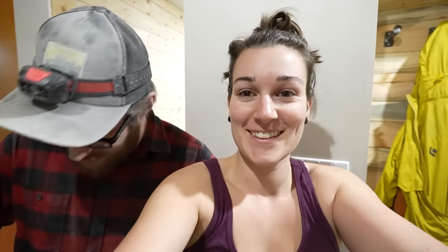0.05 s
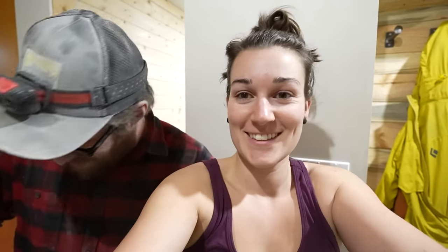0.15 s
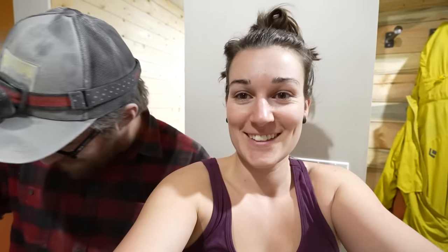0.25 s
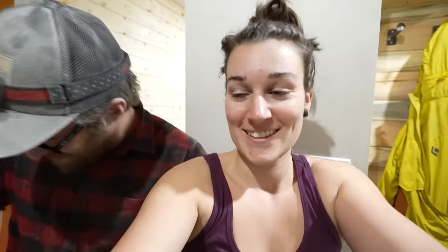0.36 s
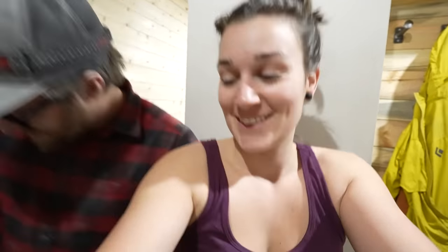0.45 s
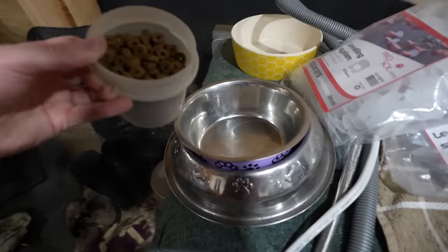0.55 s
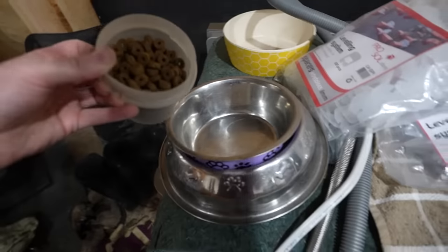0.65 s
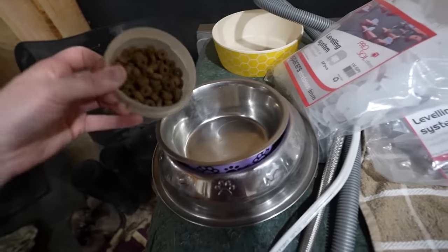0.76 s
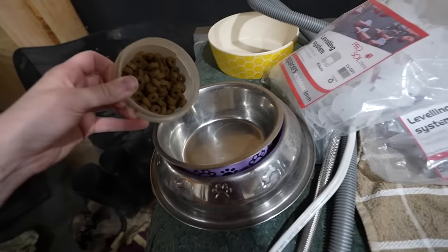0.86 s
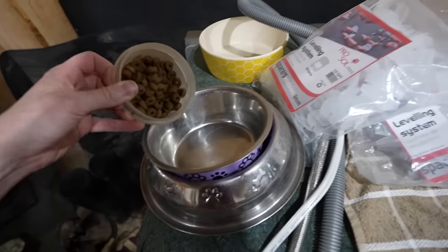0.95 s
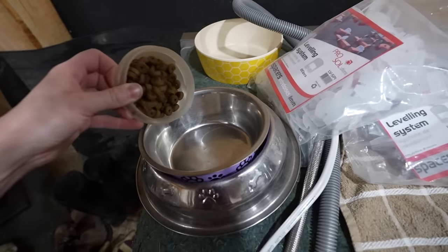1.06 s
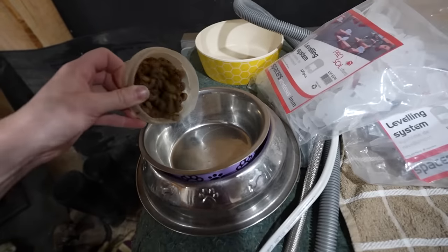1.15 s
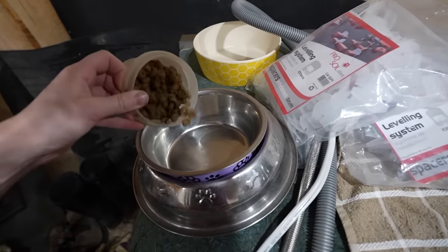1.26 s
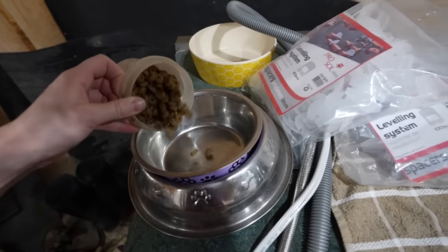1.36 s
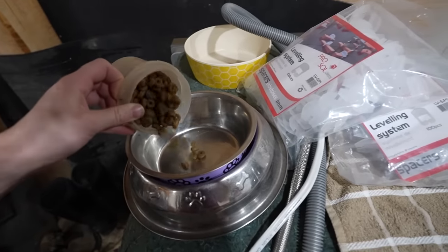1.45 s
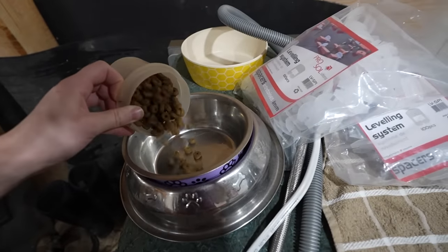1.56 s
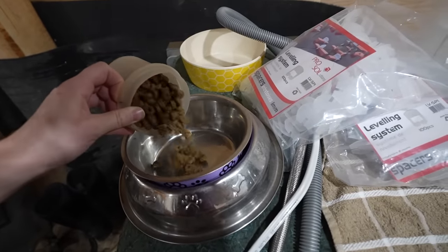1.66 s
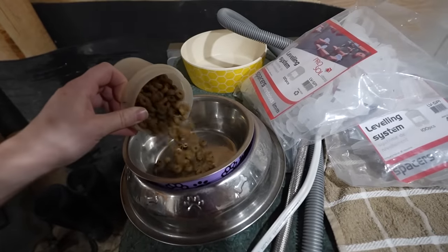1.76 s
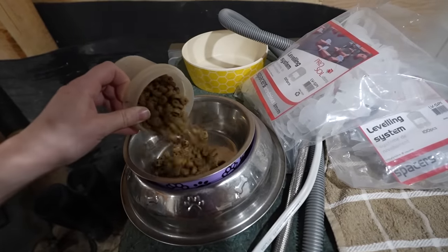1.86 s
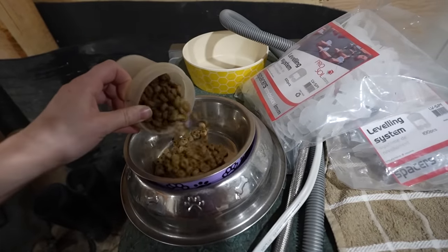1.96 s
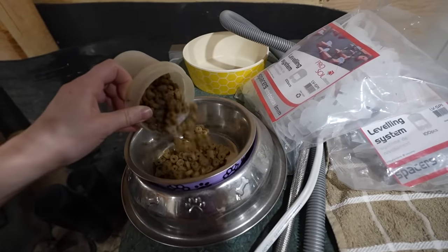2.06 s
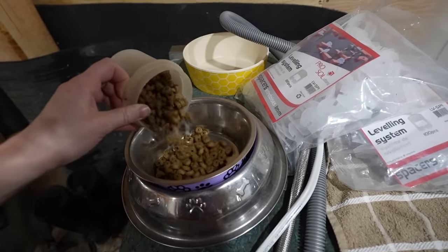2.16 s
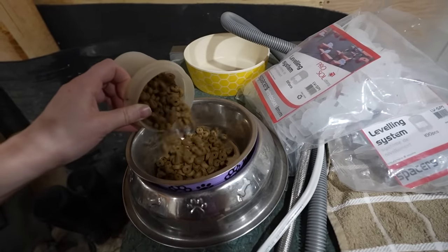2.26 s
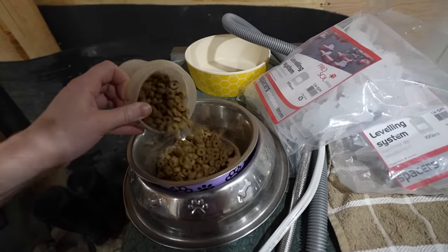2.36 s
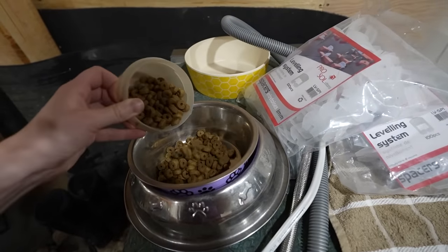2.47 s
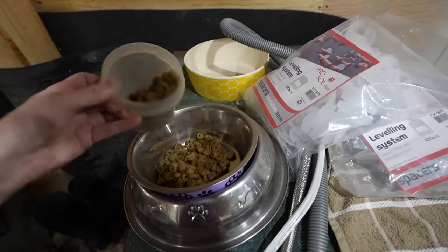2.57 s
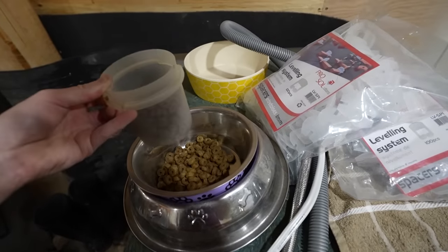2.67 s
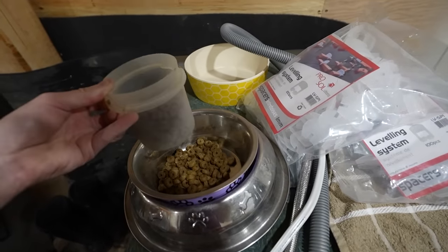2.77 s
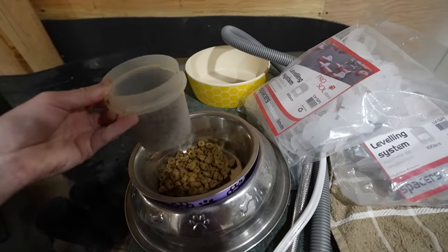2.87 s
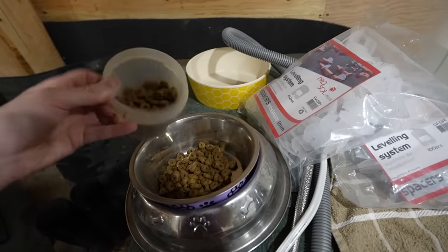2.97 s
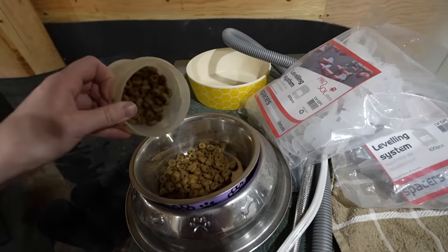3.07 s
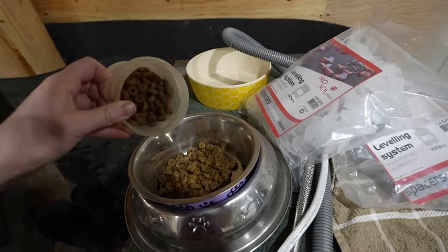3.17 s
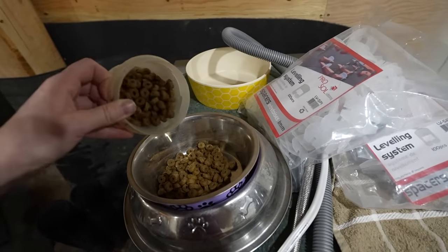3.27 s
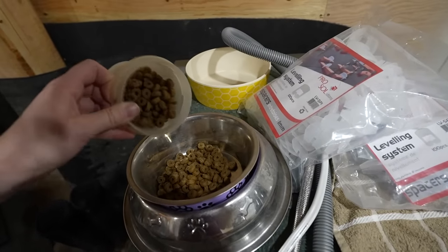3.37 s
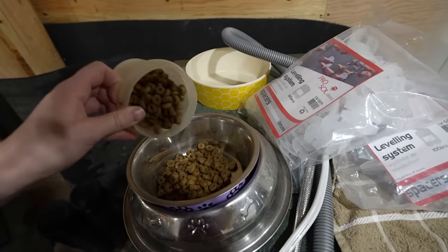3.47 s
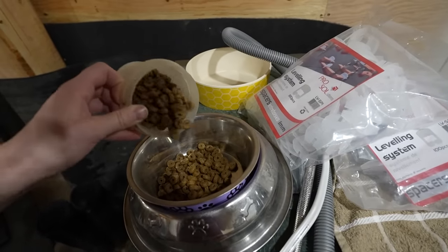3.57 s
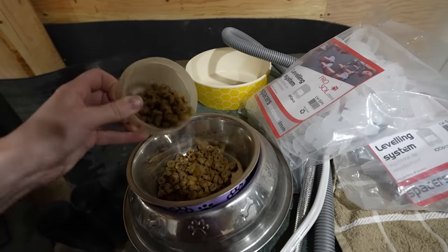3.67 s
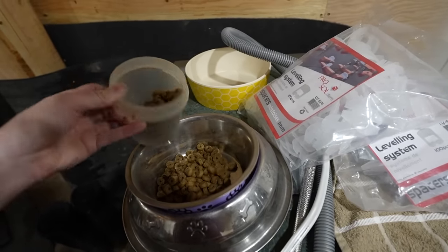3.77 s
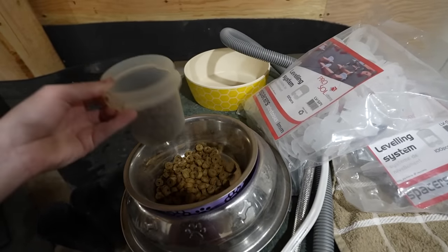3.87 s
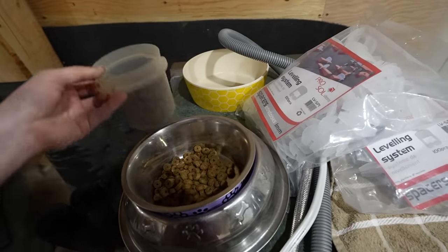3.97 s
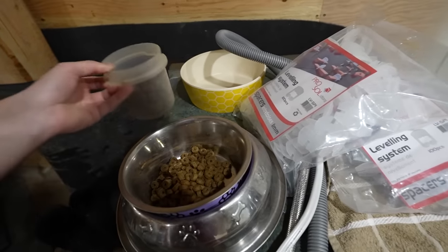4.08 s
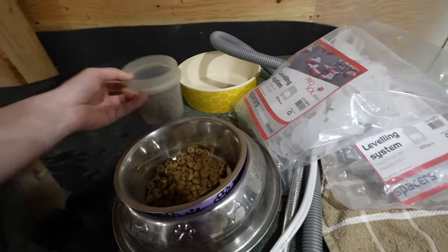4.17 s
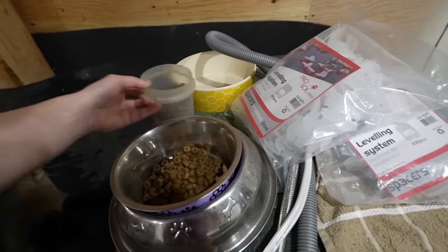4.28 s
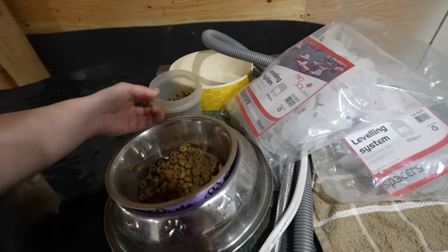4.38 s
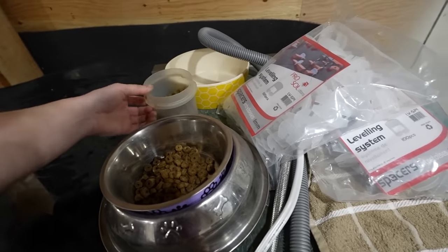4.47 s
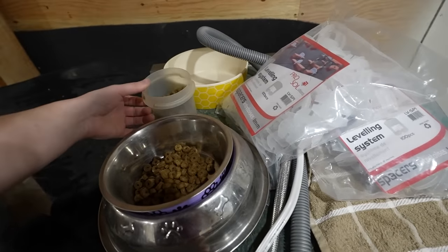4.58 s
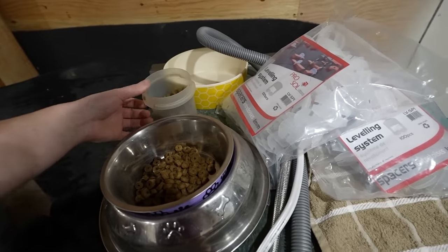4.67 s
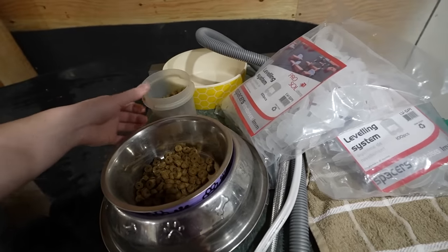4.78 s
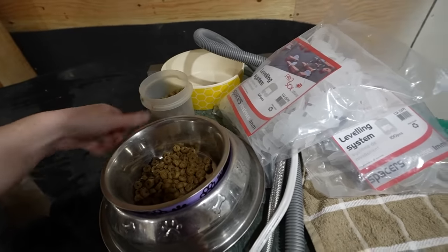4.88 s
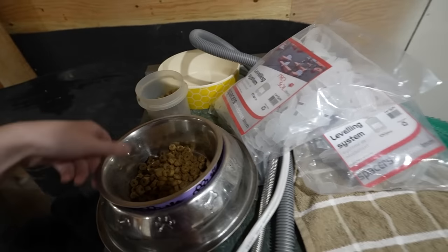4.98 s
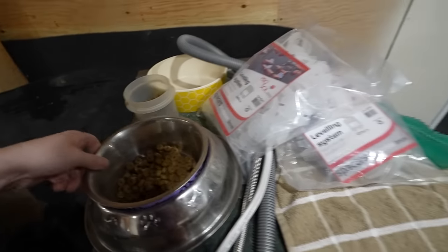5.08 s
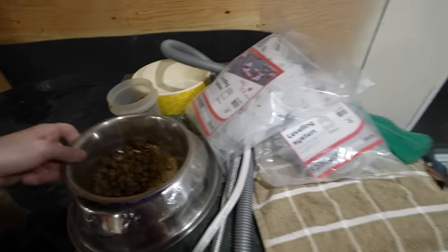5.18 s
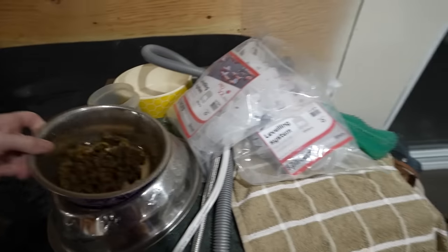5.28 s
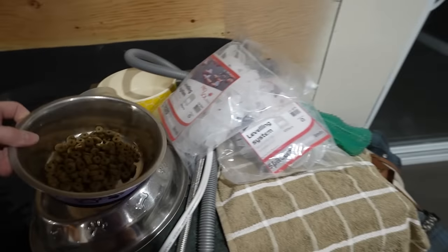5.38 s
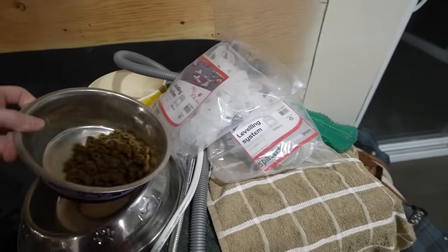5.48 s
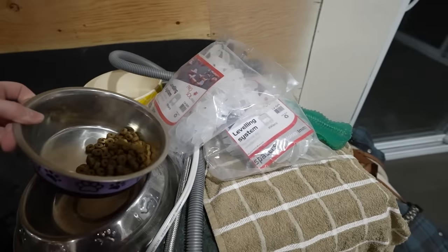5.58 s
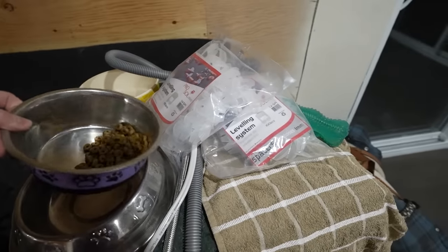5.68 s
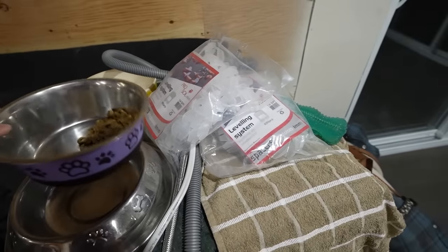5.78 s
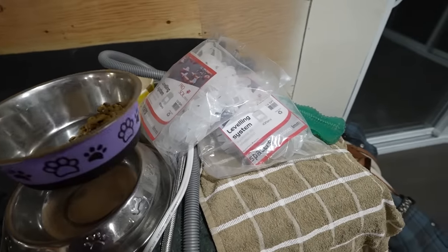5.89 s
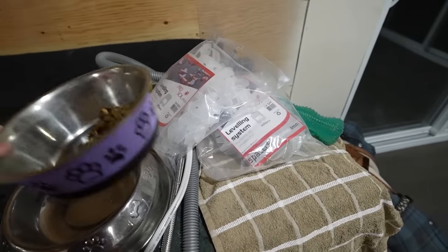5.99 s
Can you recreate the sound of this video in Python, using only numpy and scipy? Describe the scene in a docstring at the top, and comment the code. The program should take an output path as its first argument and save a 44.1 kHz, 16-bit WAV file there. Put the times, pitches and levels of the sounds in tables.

```python
"""Kibble pours into a steel dog bowl, one long pour and one short: noise snaps and brief tones excite bowl modes.
The plastic cup knocks and is put down (decaying modes, noise judder); its rim grazes in a short chirp.
The bowl leaves its stand with a swelling ping and the kibble slides across it (grainy noise).
Hands and sleeves rub (clumped hiss); the hand-held microphone adds bumps, sway and rumble.
A small room adds diffuse reflections and a faint hiss."""
import sys
import numpy as np
from scipy import signal
from scipy.fft import rfft, irfft, next_fast_len
from scipy.io import wavfile

SR = 44100
rng = np.random.default_rng(int(sys.argv[2]) if len(sys.argv) > 2 else 0)


def log_audio(samples):
    """Write samples as a 16-bit WAV file to the path given in sys.argv[1]."""
    # one column per channel
    frames = np.atleast_2d(samples).T
    # limit to full scale, then quantise
    limited = np.clip(frames, -1, 1)
    pcm = np.round(limited * 32767).astype(np.int16)
    wavfile.write(sys.argv[1], SR, pcm)


N = 266187
TIME = np.arange(N) / SR

# Loudest pellets landing in the bowl: start_s, level_db, hardness_db
LANDINGS = [(1.4108, -16.5, -0.5), (1.4134, -21, 2.5), (1.4722, -26, 3), (1.4917, -15.5, 0.5),
            (1.5063, -22.5, 12), (1.536, -17, 4.5), (1.557, -20.5, -3), (1.5748, -15.5, 6),
            (1.5797, -19.5, 7.5), (1.6061, -23.5, 4), (1.6447, -18.5, 2), (1.6782, -24, 4),
            (1.6913, -20, 2), (1.7022, -23.5, 0.5), (1.7404, -19, -1.5), (1.747, -20.5, 4.5),
            (1.7945, -18, 0.5), (1.8078, -16.5, 5.5), (1.8618, -18.5, 0), (1.8781, -16.5, -0.5),
            (1.8979, -21.5, 1), (1.9047, -19, 6.5), (1.9265, -23, 0), (1.9507, -20, 3), (1.9797, -28, -5),
            (1.9929, -25.5, -4), (2.0077, -22, -0.5), (2.0116, -16, 1), (2.0167, -20.5, 3.5),
            (2.0426, -19.5, 2), (2.0582, -17.5, 3.5), (2.0872, -23, -0.5), (2.1397, -22, -3.5),
            (2.1511, -17, 4), (2.1602, -21.5, 8.5), (2.1774, -19.5, -0.5), (2.2099, -20.5, 5),
            (2.24, -21.5, -0.5), (2.2735, -27, -3), (2.2832, -24, -5.5), (2.2979, -18, -1),
            (2.3313, -30.5, 3), (2.3614, -28.5, -2), (2.4114, -23.5, -3), (2.4323, -21, 1),
            (2.4668, -30.5, 1), (2.532, -29, -5), (2.5395, -27, -4), (2.5563, -34, -5), (3.7518, -36, -7.5),
            (3.7817, -33, 3), (3.7882, -27, -9), (3.808, -19.5, 1.5)]
# Kibble flow, one list per pour (long, short): time_s, flow_db
POURS = [
    [(1.41, -19), (1.71, -17.5), (1.76, -1.5), (1.84, -3), (1.89, 0.5), (2.11, -10.5), (2.18, -5),
     (2.23, -12.5), (2.58, -15)],
    [(3.76, -17), (3.8, -16), (3.88, -27)],
]
# Share of contacts that reaches the steel: time_s, gain_db
BARE_STEEL = [(1.4, -14), (2.0, -12.5), (2.5, -17.5), (3.7, -16)]
# Steel bowl modes: freq_hz, level_db, t60_s
BOWL_MODES = [(358, -4, .1), (422, -2, .1), (496, -3, .23), (625, -1, .07), (693, -2, .16), (770, -3, .06),
              (880, -5, .07), (917, -4, .11), (1690, -4, .06), (1748, -1, .13), (2304, -12, .15),
              (2477, -9, .17), (2777, -11, .11), (3028, -12, .15), (3224, -13, .12), (3521, -12, .17),
              (4340, -2, .035), (5821, -14, .12), (7691, -5, .09), (7850, 2, .025), (10800, 2, .015)]
# Contact spectrum: freq_hz, density_db_per_hz
CONTACT_SPECTRUM = [(150, -30), (290, -19), (370, -4), (800, 2.5), (1300, -3.5), (1750, -1), (2800, -1),
                    (4400, -4), (4900, -7), (5700, -9), (6500, -14.5), (8000, -18.5), (11000, -27),
                    (16000, -37)]
# Edges of the body, crack and sizzle bands: freq_hz
BAND_EDGES_HZ = [200, 1100, 4800, 16000]
# Light ticks of pellets and fingers on cup and bowl: start_s, level_db, hardness_db
TICKS = [(0.4615, -53.5, 19), (0.8562, -43, 15.5), (0.8905, -27.5, 1), (0.8992, -33, 8.5),
         (1.0074, -43.5, 11), (1.1467, -37, 1), (1.1889, -35, 3), (1.2285, -36, 12), (1.242, -37, 18.5),
         (1.246, -29.5, 4.5), (1.2622, -29, 3), (1.2717, -35, 12), (1.3164, -26, 3.5), (1.3416, -33, 4),
         (1.378, -32, 4.5), (2.6168, -33.5, -9.5), (2.6304, -43, -9), (2.6463, -38, -11),
         (2.6768, -31.5, -2.5), (2.7311, -34, 8), (2.7399, -30.5, 3), (2.7746, -37, 9), (3.134, -48, -21.5),
         (3.1899, -32, -9), (3.2283, -38.5, 7.5), (3.2515, -35, 0), (3.2996, -39.5, -18.5),
         (3.3027, -32, -3), (3.5627, -33.5, -11.5), (3.5652, -40, -5), (3.6568, -35, 1), (3.6902, -31, 7),
         (3.7121, -37.5, 1), (3.9177, -33.5, 9), (3.9451, -38, -4), (4.0186, -38.5, -8),
         (4.1925, -32.5, 12), (4.2828, -35.5, 13), (4.3874, -36.5, 10.5), (5.4216, -30, 0.5),
         (5.4578, -32.5, -2), (5.5279, -35, -15.5), (5.5323, -38, 12), (5.5456, -43, 13),
         (5.8129, -34, -4.5), (5.876, -39, 8.5)]
# Kibble settling as the cup or the bowl tilts: start_s, end_s, level_db
SETTLES = [(1.187, 1.33, -40), (2.66, 2.81, -39), (3.14, 3.323, -44.5), (3.53, 3.6, -42.5),
           (3.83, 4.03, -41), (5.47, 5.62, -38.5), (5.821, 5.923, -41.5)]
# Dull cup knocks: start_s, level_db, pitch_ratio, ring_time_ratio
KNOCKS = [(2.542, -17.5, 0.81, 0.74), (3.134, -34, 0.95, .8), (3.3, -28, 0.88, 0.57),
          (3.752, -26.5, 0.77, 1), (3.79, -12.5, 0.82, 0.65), (3.808, -22, 1, 0.44), (4.2901, -8, 1.0, 1),
          (4.4254, -8.5, 1.04, 0.91)]
# Modes of the cup on the worktop: freq_hz, level_db, t60_s
CUP_MODES = [(127, -15.5, 0.063), (290, -12, 0.043), (417, -3.5, 0.05), (489, -10, 0.065),
             (666, -41, 0.039), (763, -12, 0.067), (1036, -15, 0.07), (1440, -26, 0.045),
             (1700, -22, 0.021)]
# Cup rim modes as it grazes something hard on the way down: freq_hz, level_db, t60_s
RIM_MODES = [(2210, -21.5, 0.027), (2590, -24, 0.028), (4080, -18, 0.027), (4360, -20, 0.041),
             (5470, -32, .02), (6500, -39, 0.025)]
# Steel stand modes as the bowl comes free: freq_hz, level_db, t60_s
STAND_MODES = [(141, -31.5, 0.067), (239.5, -31.5, 0.11), (331, -31, 0.059), (455, -23, 0.053),
               (757, -17, 0.2), (800, -34, 0.056), (963, -32.5, 0.13)]
# Kibble sliding across the lifted bowl: time_s, level_db
SLIDE_PUSH = [(5.42, -41), (5.535, -34), (5.62, -38.5), (5.67, -49)]
# Rubs of hands, sleeves and shifting kibble: start_s, length_s, level_db, brightness_db
RUBS = [(0.557, 0.021, -61, 21.5), (0.617, 0.041, -37.5, 4.5), (0.868, 0.018, -52, -15),
        (0.887, 0.027, -31, -0.5), (0.949, .13, -37, 3), (1.187, 0.063, -56, 12), (2.662, .15, -38.5, 3.5),
        (2.932, 0.018, -43, 3.5), (3.043, 0.015, -48, -2), (3.16, 0.033, -52, -15), (3.19, 0.051, -48, 7),
        (3.293, 0.086, -41, -5), (3.507, 0.04, -43.5, 4), (3.833, .05, -41.5, 0), (3.955, .04, -37.5, -0.5),
        (4.168, 0.055, -40, 3.5), (4.31, 0.039, -38.5, 0), (4.388, 0.037, -37, 3), (4.497, 0.034, -44, 3),
        (4.748, 0.053, -43, 3.5), (4.922, 0.036, -39, 4), (5.071, .025, -48, 9.5), (5.191, 0.082, -45, -8),
        (5.393, .2, -42.5, 0), (5.725, .025, -45.5, -10), (5.806, .04, -40.5, -10.5),
        (5.857, 0.045, -37.5, -1), (5.979, 0.055, -45, -9)]
# Rub spectrum: freq_hz, density_db_per_hz
RUSTLE_SPECTRUM = [(200, 1), (360, -2), (520, -3), (780, 1), (1100, -4), (2400, 1), (3900, -1), (5200, -10),
                   (6400, -17.5), (8100, -19.5), (11000, -27.5), (13500, -33), (16000, -40)]
# Finger bumps on the microphone body: start_s, level_db
BUMPS = [(0.007, -29.5), (0.017, -24), (0.041, -25), (0.294, -35.5), (0.372, -43), (0.441, -44),
         (0.634, -36), (0.872, -34), (0.892, -28.5), (0.942, -31), (3.159, -36), (3.97, -33.5),
         (4.515, -42), (5.21, -37), (5.262, -40)]
# Bump modes: freq_hz, level_db, t60_s
BUMP_MODES = [(140.5, -2.5, 0.055), (272.3, -1.5, 0.055), (613, -9, 0.023), (1200, -9, 0.012)]
# Sway of the hand-held microphone, strongest as it swings round to the bowl: time_s, level_db
SWAY = [(0, -35), (0.2, -45), (0.5, -29.5), (0.7, -45), (1.1, -48), (1.5, -56.5), (4.8, -53.5),
        (5.3, -46.5), (6.03, -60)]
# Sway and rumble spectrum: freq_hz, density_db_per_hz
RUMBLE_SPECTRUM = [(10, 3.5), (18, -9), (27, -4.5), (42, -20.5), (80, -16), (160, -20.5), (250, -28),
                   (400, -27)]
# Steady room background: freq_hz, density_db_per_hz
AIR_SPECTRUM = [(200, -0.5), (400, -0.5), (850, -2), (1500, -5.5), (2500, -12.5), (4500, -20.5),
                (7000, -30.5), (16000, -44)]
# Room decay: freq_hz, t60_s
ROOM_T60 = [(150, 0.55), (600, 0.21), (2500, 0.4), (6000, 0.14), (15000, 0.25)]

PELLET_HZ = (992, 9030)   # range of the brief tones in each contact
SPOT_DETUNE_RATIO = 0.006   # spread of mode pitch: the heap loads each spot differently
BOUNCE_DELAY_S, BOUNCE_LOSS_DB = (0.0026, 0.011), 8.5
STRAYS_PER_S, STRAY_DB, STRAY_SPREAD_DB = 60, -24.5, 3   # level at 0 dB flow
SETTLE_PER_S, SETTLE_HARDNESS_DB, SETTLE_SPREAD_DB = 55, -2.5, 2.5
GRAZE_S, GRAZE_STEP_S = 4.1925, 0.001288
LIFT_S, STAND_SWELL_S = 5.424, 0.0027
RUB_ATTACK_S, RUB_RELEASE_DB_PER_S = 0.011, 205
FIDGET_FROM_S, FIDGET_DB = 0.85, -54.5   # faint rustle between rubs, before band trims
RUMBLE_DB, RUMBLE_FOLLOWS = -57, 0.21   # level at mean sway; share of the sway's dB swing
AIR_DB = -54.5
CUTOFF_HZ = 16200


def bowl():
    """Landings and tumbling grains excite the steel modes, differently at each spot."""
    hits = by_hardness(pellets(), dulling=0.92, brightening=0.94)
    spots = contacts(hits, band_db=[22.0, 23.0, 10.5], band_t60_s=[0.02, 0.017, 0.011], snap=3.9, tone=0.12)
    spots[0] += tumble()
    reach = from_db(np.interp(TIME, *np.transpose(BARE_STEEL)))
    rings = [signal.fftconvolve(spot * reach, steel())[:N] for spot in spots]
    return spots + np.array(rings)


def pellets():
    """Loud landings, one weaker bounce each, and strays levelled by the pour's flow."""
    rows = list(LANDINGS)
    for s, db, hardness_db in LANDINGS:
        rows.append((s + rng.uniform(*BOUNCE_DELAY_S), db - BOUNCE_LOSS_DB, hardness_db))
    for pour in POURS:
        s, flow_db = np.transpose(pour)
        for slot_s in np.arange(s[0], s[-1], 1 / STRAYS_PER_S):
            when_s = slot_s + rng.random() / STRAYS_PER_S
            level_db = STRAY_DB + np.interp(when_s, s, flow_db) + STRAY_SPREAD_DB * rng.normal()
            rows.append((when_s, level_db, STRAY_SPREAD_DB * rng.normal()))
    return rows


def by_hardness(rows, dulling, brightening):
    """Body, crack and sizzle levels: a harder contact has less body and more sizzle."""
    return [(s, db - dulling * hard_db, db, db + brightening * hard_db) for s, db, hard_db in rows]


def contacts(rows, band_db, band_t60_s, snap, tone, count=6):
    """Each contact is a snap, then decaying noise and five random tones; one track per spot."""
    out, t = np.zeros((count, N)), TIME[:SR // 20]
    edges = zip(BAND_EDGES_HZ, BAND_EDGES_HZ[1:])
    bands = [causal(CONTACT_SPECTRUM, low_hz, high_hz) for low_hz, high_hz in edges]
    for k, (s, *levels_db) in enumerate(rows):
        tones_hz = np.exp(rng.uniform(*np.log(PELLET_HZ), size=5))
        tones = np.sin(2 * np.pi * np.outer(tones_hz, t)).sum(axis=0)
        chatter = rng.standard_normal(len(t)) + tone * tones
        chatter[0] = snap * rng.choice([-1, 1])
        for band, db, trim_db, t60_s in zip(bands, levels_db, band_db, band_t60_s):
            burst = signal.fftconvolve(chatter * from_db(-60 * t / t60_s), band)
            add(out[k % count], s, from_db(db + trim_db) * energy_one(burst))
    return out


def tumble():
    """Small pellets bounce and roll between the big landings: flow-gated random impacts."""
    flow, = gains(POURS)
    impacts = grains(per_s=900, spread_db=6.0)
    low = from_db(-30.0) * shaped(impacts, CONTACT_SPECTRUM, 210, 1580)
    high = from_db(-31.5) * shaped(impacts, CONTACT_SPECTRUM, 1300, 18000)
    return flow * (low + high)


def steel():
    """Bowl impulse response at one spot: cosine modes, slightly detuned and uneven in level."""
    t, ring = TIME[:SR // 3], 0
    for hz, db, t60_s in BOWL_MODES:
        decay = from_db(db + rng.normal() - 60 * t / t60_s)
        spot_hz = hz * (1 + SPOT_DETUNE_RATIO * rng.normal())
        ring = ring + decay * np.cos(2 * np.pi * spot_hz * t)
    return energy_one(ring)


def ticks():
    """Dry contacts that bypass the bowl modes: single ones, and random runs as kibble settles."""
    rows = list(TICKS)
    for start_s, end_s, db in SETTLES:
        for slot_s in np.arange(start_s, end_s, 1 / SETTLE_PER_S):
            when_s = slot_s + rng.random() / SETTLE_PER_S
            level_db = rng.normal(db, SETTLE_SPREAD_DB)
            rows.append((when_s, level_db, rng.normal(SETTLE_HARDNESS_DB, SETTLE_SPREAD_DB)))
    hits = by_hardness(rows, dulling=0.99, brightening=1.18)
    return contacts(hits, band_db=[15.0, 23.5, 9.5], band_t60_s=[0.02, 0.016, 0.012], snap=0.69, tone=0.25)


def cup():
    """The cup knocks on the bowl and is set down: hollow modes, then a dull noise judder."""
    out, t = np.zeros(N), TIME[:SR // 10]
    dull = causal(CONTACT_SPECTRUM, 254, 1640)
    for s, db, pitch, length in KNOCKS:
        add(out, s, from_db(db - 2.0) * ringing(CUP_MODES, pitch, length, uneven_db=2.0))
        judder = signal.fftconvolve(rng.standard_normal(len(t)) * from_db(-60 * t / 0.11), dull)
        add(out, s + 0.00202, from_db(db + 10.0) * energy_one(judder))
    return out


def graze():
    """The cup's rim catches and slips four times in quick succession: a short bright chirp."""
    out = np.zeros(N)
    for k in range(4):
        when_s = GRAZE_S + GRAZE_STEP_S * (k + rng.uniform(-0.4, 0.48))
        add(out, when_s, from_db(-8.0 - 1.3 * k) * ringing(RIM_MODES, uneven_db=2.0))
    return out


def stand():
    """The rim drags off the stand, so the ping swells over a few milliseconds."""
    out, ping = np.zeros(N), ringing(STAND_MODES)
    swell = 1 - np.exp(-TIME[:len(ping)] / STAND_SWELL_S)
    add(out, LIFT_S, from_db(1.5) * ping * swell)
    return out


def slide():
    """The heap scrapes over the steel in spurts of fine slips."""
    push, = gains([SLIDE_PUSH])
    slips = grains(per_s=900, spread_db=2.0) * unevenness(per_s=160, spread_db=2.0)
    low = from_db(0.5) * shaped(slips, CONTACT_SPECTRUM, 390, 1100)
    high = from_db(-3.5) * shaped(slips, CONTACT_SPECTRUM, 1240, 14710)
    return push * (low + high)


def rustle():
    """Friction: clumped hiss and fine grains; each rub swells, holds and dies away."""
    fidget = from_db(FIDGET_DB) * (TIME > FIDGET_FROM_S)
    power = np.outer(from_db([-3, 0, -18]), fidget) ** 2   # low, mid, high
    t = TIME[:SR]
    for s, length_s, db, bright_db in RUBS:
        release_db = RUB_RELEASE_DB_PER_S * np.maximum(t - length_s, 0)
        stroke = np.minimum(t / RUB_ATTACK_S, 1) * from_db(db - release_db)
        for band, tilt_db in zip(power, (-bright_db, 0, bright_db)):
            add(band, s, (stroke * from_db(tilt_db)) ** 2)
    low, mid, high = np.sqrt(power)
    rub = rng.standard_normal(N) + 0.9 * grains(per_s=1200, spread_db=2.5)
    rub = rub * unevenness(per_s=220, spread_db=3.0)
    return (from_db(-10.5) * low * shaped(rub, RUSTLE_SPECTRUM, 230, 1440)
            + from_db(-2.58) * mid * shaped(rub, RUSTLE_SPECTRUM, 1540, 6600)
            + from_db(-23.5) * high * shaped(rub, RUSTLE_SPECTRUM, 5630, 16000))


def handling():
    """Sway, rumble and soft bumps reach the microphone through its body."""
    sway_db = np.interp(TIME, *np.transpose(SWAY))
    rumble_db = RUMBLE_DB + RUMBLE_FOLLOWS * (sway_db - sway_db.mean())
    noise = rng.standard_normal(N)
    out = from_db(sway_db) * shaped(noise, RUMBLE_SPECTRUM, 14.6, 32.0)
    out += from_db(rumble_db) * shaped(noise, RUMBLE_SPECTRUM, 34.7, 314)
    thud = ringing(BUMP_MODES)
    for s, db in BUMPS:
        add(out, s, from_db(db) * thud)
    return out


def air():
    """Faint, dull room hiss: steady shaped noise."""
    return from_db(AIR_DB) * shaped(rng.standard_normal(N), AIR_SPECTRUM, 180, 16000)


def room(x, wet_db, first_s):
    """Diffuse reflections: octave bands of noise that build up and die away."""
    t, tail = TIME[:SR // 2], 0
    for hz in 177 * 2 ** np.arange(7):
        octave_hz = [hz / np.sqrt(2), hz * np.sqrt(2)]
        octave = signal.butter(2, octave_hz, "band", fs=SR, output="sos")
        band = signal.sosfilt(octave, rng.standard_normal(len(t)))
        tail = tail + band * from_db(-60 * t / at_hz(ROOM_T60, hz))
    buildup = 1 - np.exp(-t / first_s)
    return signal.fftconvolve(x, from_db(wet_db) * energy_one(tail * buildup))[:N]


def ringing(modes, pitch=1, length=1, uneven_db=0):
    """Decaying sines of a struck body, alternating in sign; uneven_db varies their strengths."""
    t, out = TIME[:SR // 3], 0
    for k, (hz, db, t60_s) in enumerate(modes):
        decay = from_db(db + uneven_db * rng.normal() - 60 * t / (t60_s * length))
        out = out + (-1) ** k * decay * np.sin(2 * np.pi * hz * pitch * t)
    return out


def grains(per_s, spread_db):
    """Random tiny impacts of uneven size and sign; rms 1."""
    sizes = from_db(spread_db * np.minimum(rng.exponential(1, N), 3)) * rng.choice([-1, 1], N)
    return rms_one(sizes * (rng.random(N) < per_s / SR))


def unevenness(per_s, spread_db):
    """Gain that wanders as rubbing pressure comes and goes."""
    knots = rng.standard_normal(4000)
    return from_db(spread_db * np.interp(TIME * per_s, np.arange(len(knots)), knots))


def causal(spectrum, low_hz, high_hz, size=1024):
    """Minimum-phase impulse response of one band of a spectrum, by folded cepstrum."""
    hz = np.maximum(np.arange(size // 2 + 1) * SR / size, 20)
    skirts = 1 / np.sqrt((1 + (low_hz / hz) ** 8) * (1 + (hz / high_hz) ** 8))
    cepstrum = irfft(np.log(from_db(at_hz(spectrum, hz)) * skirts + 1e-6))
    cepstrum[1:size // 2] *= 2
    cepstrum[size // 2 + 1:] = 0
    return energy_one(irfft(np.exp(rfft(cepstrum))))


def shaped(x, spectrum, low_hz, high_hz):
    """One band of a signal, coloured by a spectrum; rms 1."""
    size = next_fast_len(N)
    hz = np.arange(size // 2 + 1) * SR / size + 1
    skirts = 1 / np.sqrt((1 + (low_hz / hz) ** 10) * (1 + (hz / high_hz) ** 10))
    return rms_one(irfft(rfft(x, size) * from_db(at_hz(spectrum, hz)) * skirts, size)[:N])


def gains(spells):
    """Gain curves of the dB columns; each spell fades in and out."""
    total = 0
    for rows in spells:
        s, *columns = np.transpose(rows)
        gate = np.clip(1 + np.minimum(TIME - s[0], s[-1] - TIME) / 0.0044, 0, 1)
        total = total + gate * np.array([from_db(np.interp(TIME, s, db)) for db in columns])
    return total


def at_hz(points, hz):
    """Read a table on a log-frequency axis."""
    f, value = np.transpose(points)
    return np.interp(np.log(np.maximum(hz, 1)), np.log(f), value)


def add(out, s, sound):
    """Mix a sound in at a time in seconds."""
    i = max(int(s * SR), 0)
    out[i:i + len(sound)] += sound[:N - i]


def from_db(db):
    """Decibels to gain."""
    return 10 ** (np.asarray(db) / 20)


def rms_one(x):
    """Scale to an rms of one."""
    return x / np.sqrt(np.mean(x ** 2) + 1e-20)


def energy_one(x):
    """Scale to an energy of one."""
    return x / np.sqrt(np.sum(x ** 2) + 1e-20)


def scene():
    """Each spot has its own reflections; one microphone feeds both channels alike."""
    spots = bowl() + ticks()
    thuds = cup() + graze() + stand() + slide()
    rubs = rustle()
    echoes = sum(room(spot, wet_db=-11.5, first_s=0.00044) for spot in spots)
    echoes += room(thuds, wet_db=-14.0, first_s=0.002)
    echoes += room(rubs, wet_db=-10.5, first_s=0.0024)
    mono = spots.sum(axis=0) + thuds + rubs + echoes + handling() + air()
    return np.array([mono, mono])


def record(dry):
    """Soft saturation rounds the loudest peaks; a steep low-pass cuts the top."""
    ceiling = 0.85
    rounded = ceiling * np.tanh(dry / ceiling)
    lowpass = signal.cheby2(14, 70, CUTOFF_HZ + 600, fs=SR, output="sos")   # stopband edge
    return signal.sosfilt(lowpass, rounded)


dry = scene()
out = record(dry)
log_audio(out)
```